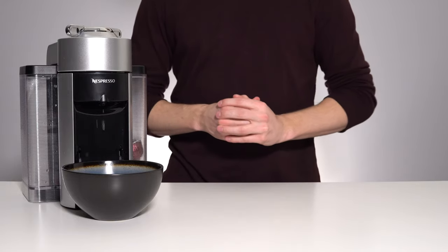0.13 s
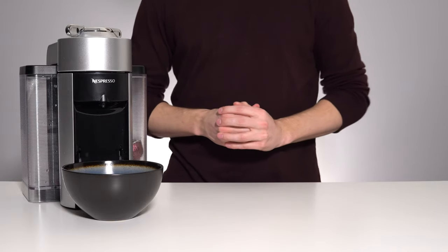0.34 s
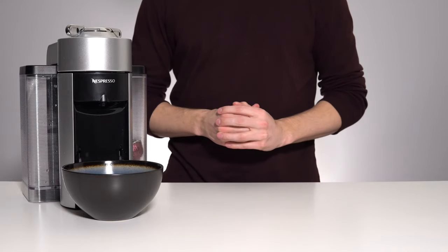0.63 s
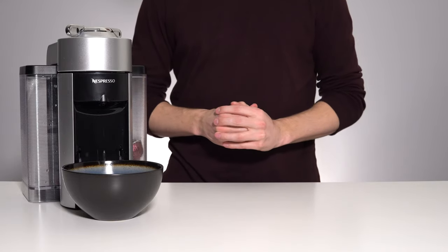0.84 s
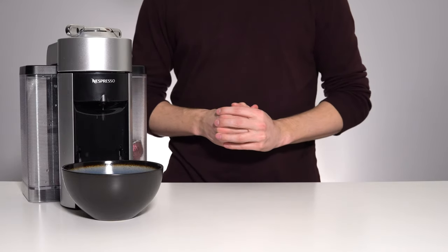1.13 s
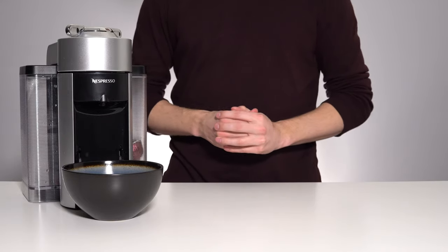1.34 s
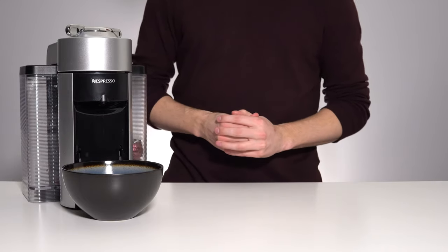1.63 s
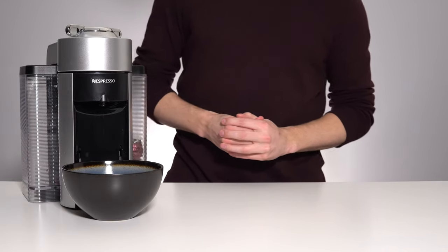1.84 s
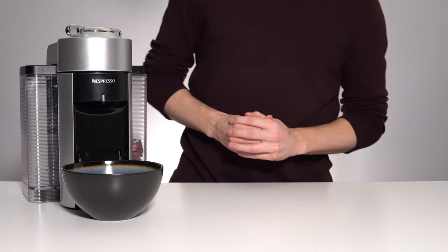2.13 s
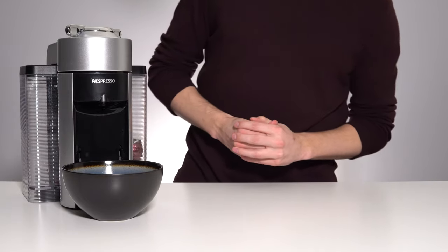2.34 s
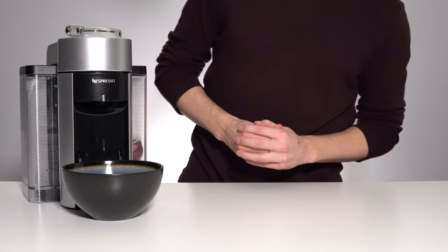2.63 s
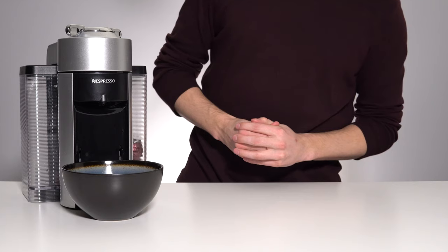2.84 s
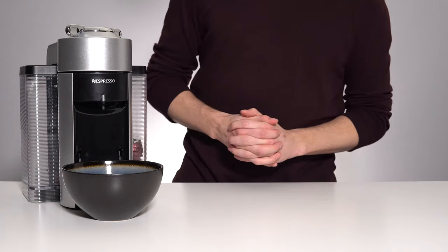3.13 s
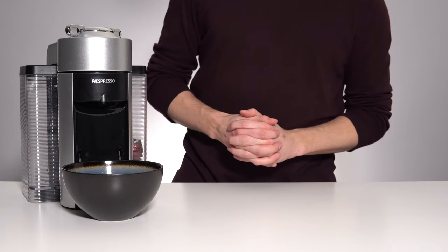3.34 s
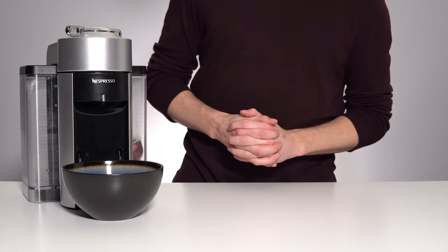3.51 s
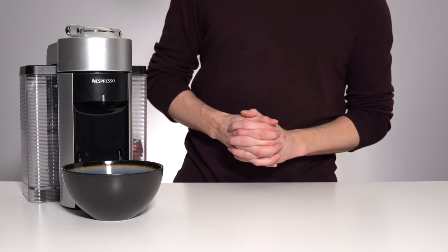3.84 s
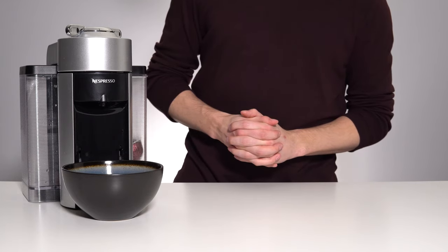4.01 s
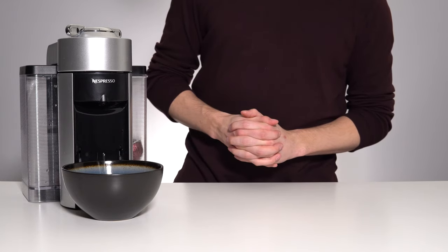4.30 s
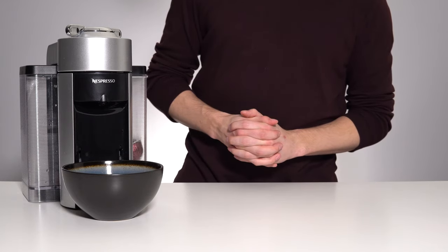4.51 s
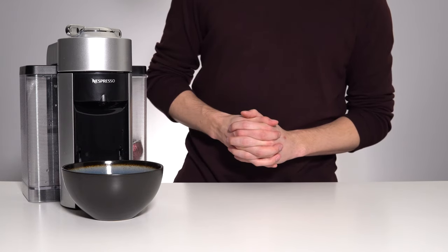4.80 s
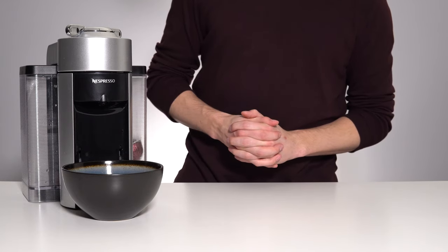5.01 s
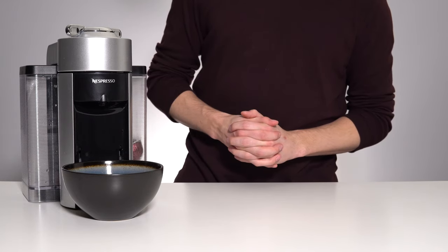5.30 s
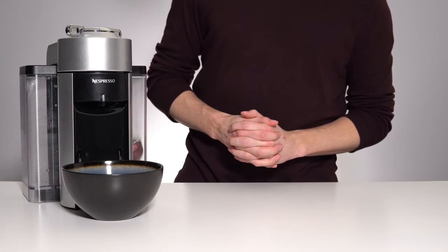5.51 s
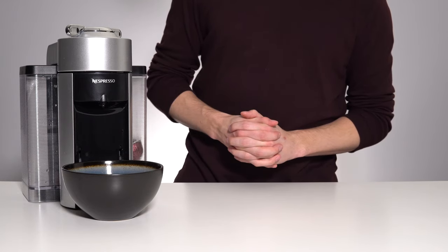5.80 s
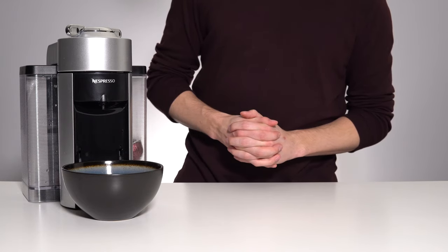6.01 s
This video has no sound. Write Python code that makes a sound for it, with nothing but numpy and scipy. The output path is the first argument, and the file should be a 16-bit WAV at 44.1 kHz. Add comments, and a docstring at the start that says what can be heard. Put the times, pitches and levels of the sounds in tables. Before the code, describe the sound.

A capsule coffee machine buzzes and rattles as it pumps water, then cuts off and winds down with a falling whine.

```python
"""A capsule coffee machine on a kitchen table drives water through. It opens with a short spurt of spray
over the steady buzz of its motor, which knocks in step with the mains, whines and rattles in the
plastic housing above a rush of water. A dull bump comes through the table, then the power is cut and
the machine shudders on its feet. The rotor coasts to rest with a falling whine and a dulling whirr,
and the quiet room remains."""
import sys
import numpy as np
from scipy import signal
from scipy.fft import rfft, irfft, next_fast_len
from scipy.io import wavfile

SR = 44100
rng = np.random.default_rng(int(sys.argv[2]) if len(sys.argv) > 2 else 0)


def inscribe(sig):
    """Save sig as 16-bit PCM at rate SR to the path in sys.argv[1].

    A 1-D sig is mono; a 2-D sig holds one channel per row.
    Samples are clipped to [-1, 1] before scaling.
    """
    pcm = np.round(np.clip(np.atleast_2d(sig).T, -1, 1) * 32767)
    wavfile.write(sys.argv[1], SR, pcm.astype(np.int16))


N = 271479
TIME = np.arange(N) / SR
MAINS_HZ, POWER_OFF_S = 59.99, 3.216


def from_db(db):
    """Decibels to gain."""
    return 10 ** (np.asarray(db) / 20)


def rms_one(x):
    """Scale to unit rms."""
    return x / np.sqrt(np.mean(x ** 2) + 1e-20)


def automation(rows):
    """A curve through (seconds, value) breakpoints."""
    return np.interp(TIME, *np.transpose(rows))


def colour(x, points):
    """EQ through (Hz, dB) points joined on a log-frequency axis."""
    hz, db = np.transpose(points)
    size = next_fast_len(N + SR // 2)
    bins = np.maximum(np.fft.rfftfreq(size, 1 / SR), 1)
    gain = from_db(np.interp(np.log(bins), np.log(hz), db))
    return irfft(rfft(x, size) * gain, size)[:N]


def noise(points):
    """Coloured noise of unit rms."""
    return rms_one(colour(rng.standard_normal(N), points))


def resonant_noise(modes):
    """Noise of unit rms through parallel resonances of alternating polarity."""
    white, out = rng.standard_normal(N), 0
    for k, (hz, width, db) in enumerate(modes):
        r = np.exp(-np.pi * width / SR)
        band = signal.lfilter([1, 0, -1], [1, -2 * r * np.cos(2 * np.pi * hz / SR), r * r], white)
        out += (-1) ** k * from_db(db) * (1 - r * r) / 2 * band
    return rms_one(out)


def lowpass(x, hz):
    """Zero-phase low-pass for splitting bands."""
    return signal.sosfiltfilt(signal.butter(2, hz, fs=SR, output="sos"), x)


def drift(rate_hz):
    """Smooth random modulation of unit rms."""
    hop, settle = 100, 2000
    r = np.exp(-2 * np.pi * rate_hz * hop / SR)
    slow = signal.lfilter([1], [1, -2 * r, r * r], rng.standard_normal(N // hop + settle + 2))[settle:]
    return np.interp(np.arange(N) / hop, np.arange(len(slow)), rms_one(slow))


def phase_of(hz):
    """Running phase of a moving pitch."""
    return 2 * np.pi * np.cumsum(hz) / SR


def scatter(x, t60):
    """Smear a sound over dense, decaying reflections."""
    t = np.arange(SR // 2) / SR
    tail = rng.standard_normal(len(t)) * from_db(-60 * t / t60)
    return signal.fftconvolve(x, tail / np.linalg.norm(tail))[:N]


def powered(t60, hold_s=0):
    """Full level until the power is cut, then a hold and a release."""
    return from_db(-60 * np.maximum(TIME - POWER_OFF_S - hold_s, 0) / t60)


# Spurts at the spout. Each row: time of the peak in seconds, hold in seconds, level in dB.
SPURTS = [(0.033, 0.036, -31), (.124, .008, -38.5)]
# Their bright hiss. Each row: frequency in Hz, gain in dB.
SPRAY_EQ = [(1500, -14), (3500, -5), (4400, 2), (5000, 6.5), (5600, 0.5), (7700, 1.5), (10000, -5.5),
            (13000, -14), (16000, -32)]

def spray(attack_s=0.031, t60=0.21, flutter_db=2.0):
    """Each spurt of spray rises quickly, holds and dies away."""
    swell = 0
    for s, hold, db in SPURTS:
        attack = np.exp(np.minimum(TIME - s, 0) / attack_s)
        swell += attack * from_db(db - 60 * np.maximum(TIME - s - hold, 0) / t60)
    return swell * from_db(flutter_db * drift(40)) * noise(SPRAY_EQ)


# Harmonics of the knocking. Each row: multiple of the mains rate, relative level in dB.
BUZZ_PARTIALS = [(1, -16), (2, -31.5), (3, -23.5), (4, -11), (5, 0.5), (6, 0.5), (7, -0.5), (8, -3.5),
                 (9, -5), (10, -3), (11, -4), (12, -3.5), (13, -3.5), (14, -6), (15, -17), (16, -10),
                 (17, -6.5), (18, -5.5), (19, -15), (20, 1), (21, -9.5), (22, -8.5), (23, -10.5), (24, -26),
                 (25, -12.5), (26, -12.5), (27, -10.5), (28, -9), (29, -13), (30, -14), (31, -25),
                 (32, -10), (33, -10.5), (34, -28), (35, -18), (36, -27), (37, -33.5), (38, -11), (39, -31),
                 (40, -11.5), (41, -19.5), (42, -33), (43, -30), (44, -11.5), (45, -28), (46, -18),
                 (47, -14), (48, -13.5), (49, -16)]

def buzz(cycle, load_db, ring_db, level_db=-32, rebound_s=.0081):
    """Knocks fuse into a buzz, combed by their rebound; the shell scrambles the phases."""
    body_db = 10 * np.log10(sum(10 ** (db / 10) for k, db in BUZZ_PARTIALS if 4 < k < 17))
    rebound = -.05 + 0.19 * load_db  # harder under a heavier load
    resonance_db = 1.2 + 1.35 * (ring_db - np.mean(ring_db))
    out = 0
    for k, db in BUZZ_PARTIALS[1:]:  # hum() plays the fundamental
        phase = 2 * np.pi * (k * cycle + rng.random()) + 0.15 * drift(1.2)
        partial = np.cos(phase) + rebound * np.cos(phase - 2 * np.pi * k * MAINS_HZ * rebound_s)
        swell_db = resonance_db if k in (20, 21) else load_db  # these two sit on the main resonance
        waver_db = np.interp(k, [1, len(BUZZ_PARTIALS)], [1.52, 2.0]) * drift(1.6)
        out += np.sqrt(2) * from_db(level_db + db - body_db + swell_db + waver_db) * partial
    return out


def hum(level_db=-54, rocking_hz=69):
    """The whole machine shakes at the mains rate; set free, it rocks out at its own pitch."""
    hz = np.interp(TIME, [POWER_OFF_S, POWER_OFF_S + .04], [MAINS_HZ, rocking_hz])
    return np.sqrt(2) * from_db(level_db) * powered(t60=0.54, hold_s=.08) * np.sin(phase_of(hz))


# The plastic edge of the rattle. Each row: frequency in Hz, gain in dB.
RATTLE_EQ = [(900, -28), (1500, -1), (2400, -9), (2900, 8), (3500, 0), (4800, -4), (9000, -20.5)]

def rattle(cycle, contacts=4, jitter_s=.00015, uneven_db=4.5):
    """Loose contacts tap once a cycle, each a little early or late, harder or softer."""
    out = 0
    for place in rng.random(contacts):
        taps = np.flatnonzero(np.diff(np.floor(cycle - place)) > 0)
        late, hard = rng.standard_normal((len(taps), 2)).T
        taps += np.round(late * jitter_s * SR).astype(int)
        clicks = np.zeros(N)
        clicks[np.clip(taps, 0, N - 1)] = from_db(uneven_db * hard)
        out += scatter(clicks * from_db(3 * drift(1)), t60=0.023)
    return rms_one(colour(out, RATTLE_EQ))


# Resonances of the housing. Each row: centre in Hz, width in Hz, gain in dB.
HOUSING_MODES = [(516, 88, 0), (853, 154, -7), (1236, 76, 4.5), (1450, 60, -15), (2214, 33, -12),
                 (2990, 190, -20), (4440, 64, -18)]

def housing_ring(ring_db, power, coasting_db=-49):
    """The rotor rings the housing, more softly once it coasts."""
    level = powered(t60=0.72) * from_db(ring_db - 4) + (1 - power) * from_db(coasting_db)
    return level * from_db(0.75 * drift(6)) * resonant_noise(HOUSING_MODES)


RUNNING_HZ = 1258

def rotor_pitch(drag_s=2.6, stands_at_s=4.67):
    """Pitch of the whine in Hz: steady until friction and drag bring the rotor to rest."""
    run_down = np.exp(-np.maximum(TIME - POWER_OFF_S, 0) / drag_s)
    rest = np.exp(-(stands_at_s - POWER_OFF_S) / drag_s)
    return np.maximum(RUNNING_HZ * (run_down - rest) / (1 - rest), 1e-3)


# Tones of the rotor. Each row: multiple of the whine's pitch, relative level in dB.
WHINE_PARTIALS = [(.4, -19), (.5, -4), (.6, -14), (1, -2), (2, -9)]

def whine(pitch_hz, ring_db, power, critical_hz=970, critical_width_hz=54, direct_db=-11.5):
    """Rotor tones, rougher without power, flare as they slide through the housing's resonances."""
    coasting_db = -45 - 10 * np.log2(RUNNING_HZ / pitch_hz)
    level = power * from_db(ring_db - 8.5) + (1 - power) * from_db(coasting_db)
    tremble = np.where(TIME < POWER_OFF_S, 0.0079, 0.0281)
    phase = phase_of(pitch_hz * (1 + tremble * drift(69.7)))
    # at the critical speed, unbalance shakes the machine at half the whine's pitch
    shake_db = 12 * np.exp(-((pitch_hz - critical_hz) / critical_width_hz) ** 2)
    out = 0
    for k, db in WHINE_PARTIALS:
        flare = sum(from_db(mode_db) / np.hypot(1, 2 * (k * pitch_hz - hz) / width)
                    for hz, width, mode_db in HOUSING_MODES)
        gain = from_db(db + shake_db * (k == .5) + 3.1 * drift(29))
        out += gain * (from_db(direct_db) + flare) * np.sin(k * phase)
    return level * out


# The motor's thin top notes. Each row: pitch in Hz, level in dB.
SINGING_TONES = [(3615, -55.5), (4675, -61.5), (4812, -57)]

def singing(tremble=0.00116):
    """The motor sings in high tones that tremble in pitch."""
    return sum(np.sqrt(2) * from_db(db) * np.sin(phase_of(hz * (1 + tremble * drift(16.3))))
               for hz, db in SINGING_TONES)


# The broad body of the water. Each row: frequency in Hz, gain in dB.
RUSH_EQ = [(30, -34), (100, -28), (180, -16), (280, -3.5), (400, 1.5), (800, -0.5), (1000, -1.5),
           (1900, -4.5), (2150, -6), (2850, -6), (3300, -11), (5400, -15), (8000, -16), (11000, -22),
           (16000, -25)]
# Narrow resonances of tubes and panels. Each row: centre in Hz, width in Hz, gain in dB.
PANEL_MODES = [(1676, 30, 7), (1948, 28, 4.5), (2366, 55, 5), (2814, 16, 2), (3880, 48, -1.5),
               (4830, 38, -21), (6040, 210, -13.5), (7810, 81, -18), (9200, 38, -21), (10730, 88, -14),
               (12800, 85, -16), (13800, 40, -21)]

def rush(cycle, load_db, split_hz=940):
    """Churning water: the lows throb with each knock, the hiss is smoother, tubes and panels ring."""
    water = noise(RUSH_EQ)
    low = lowpass(water, split_hz)
    stroke = np.cos(2 * np.pi * cycle) + 1.3 * np.cos(4 * np.pi * cycle + 2)
    stroke += 1.1 * np.cos(6 * np.pi * cycle)
    churn = low * from_db(-35.5 + load_db + 0.35 * stroke + 1.8 * drift(24))
    hiss = (water - low) * from_db(-35 + 0.9 * load_db + 0.26 * stroke + 0.37 * drift(50))
    panels = resonant_noise(PANEL_MODES) * from_db(-43.5 + 0.9 * load_db)
    return churn + hiss + panels


# Loose clatters. Each row: time of the peak in seconds, level in dB, rise and fall time in seconds.
CLATTERS = [(.2, -41, .015), (1.67, -42, .015), (1.735, -33, .014), (2.46, -40, .06), (2.605, -35.5, .011),
            (3.13, -43, .025), (3.209, -36.5, .015), (4.335, -53.5, .018)]
# Their hard midrange. Each row: frequency in Hz, gain in dB.
CLATTER_EQ = [(700, -18), (1400, -2), (2100, 13), (3400, 6), (4500, -5), (7000, -18), (14000, -32)]

def clatter(grain_db=3.0):
    """Short flurries of taps on the shell, played as grainy bursts of noise."""
    swell = sum(from_db(db) * np.exp(-abs(TIME - s) / length) for s, db, length in CLATTERS)
    return swell * from_db(grain_db * drift(150)) * noise(CLATTER_EQ)


def bump(at_s=3.088, width_s=.007, peak_db=-48):
    """One soft, dull pulse through the table."""
    return from_db(peak_db) * np.exp(-((TIME - at_s) / width_s) ** 2)


def shudder(at_s=3.24, width_s=0.16, level_db=-57.5, hz=178):
    """The machine shudders on its feet as the pump stops: a low tone swells and fades."""
    swell = from_db(level_db) * np.exp(-((TIME - at_s) / width_s) ** 2)
    return np.sqrt(2) * swell * np.sin(phase_of(hz * (1 + .02 * drift(20))))


# The rotor's rubbing before it dulls. Each row: frequency in Hz, gain in dB.
WHIRR_EQ = [(40, -45), (130, -24), (210, -6), (350, 1), (800, -3.5), (1700, -2), (3000, 3), (4600, -1),
            (7000, -2), (10000, -2), (16000, -11.5)]

def whirr(pitch_hz, level_db=-39.5, db_per_octave=4):
    """The coasting rotor rubs: the slower it turns, the softer and duller it gets."""
    rubbing, out, below = noise(WHIRR_EQ), 0, 0
    cutoff_hz = 7.3 * pitch_hz + 350
    for hz in np.geomspace(1000, 16000, 9):  # a closing low-pass, band by band
        upto = lowpass(rubbing, hz)
        out += (upto - below) / np.sqrt(1 + (hz / cutoff_hz) ** 4)
        below = upto
    return out * from_db(level_db - db_per_octave * np.log2(RUNNING_HZ / pitch_hz) + 0.5 * drift(40))


def stereo(mid, side):
    """Mid and side to left and right."""
    return np.array([mid + side, mid - side])


# The kitchen's room tone. Each row: frequency in Hz, gain in dB.
ROOM_EQ = [(15, -56), (25, -19), (91, -16), (113, -4), (173, -10), (209, -3.5), (267, -7), (297, -5.5),
           (482, -5.5), (648, -8.5), (945, -10.5), (1300, -12), (2120, -13.5), (15500, -18)]
# Its spread. Each row: frequency in Hz, side against mid in dB.
ROOM_WIDTH = [(60, -30), (240, -7.5), (950, 0.5), (3770, -1.5), (15000, -1)]

def room_tone(level_db=-60):
    """The quiet room: a bed of noise, centred in the bass and wide above."""
    return from_db(level_db) * stereo(noise(ROOM_EQ), colour(noise(ROOM_EQ), ROOM_WIDTH))


# Load on the pump. Each row: time in seconds, dB above its usual effort.
PUMP_LOAD = [(0, 2.0), (.21, 2), (.33, 0.17), (2.22, 0), (2.48, 1.7), (2.82, -0.26), (3.05, 0.2),
             (3.2, 1.4)]
# Swell of the housing's resonance, which the whine follows. Each row: time in seconds, drive in dB.
RING_DRIVE = [(0.0, -36), (0.31, -36), (0.45, -43), (0.87, -43), (1.07, -39), (1.09, -42.5), (1.39, -39),
              (1.59, -45), (1.68, -39), (1.76, -42), (1.93, -38.5), (1.97, -43), (2.48, -35.5), (2.55, -43),
              (2.71, -32.5), (2.74, -37.5), (3.2, -34.5)]
# The machine's spread. Each row: frequency in Hz, gain of the side signal in dB.
MACHINE_WIDTH = [(60, -48), (120, -33), (240, -57), (480, -17.5), (950, -10), (1890, -6), (3770, -5),
                 (7520, -4.5), (15000, -4)]
# Its slight lean off centre. Each row: frequency in Hz, left minus right in dB.
MACHINE_PAN = [(120, 0), (240, .3), (480, 0), (950, -1.5), (1890, -.6), (3770, 0), (7520, -1.2),
               (15000, -2.4)]

def scene():
    """The machine under power and coasting, with the kitchen's reflections, over the room tone."""
    load_db, ring_db = automation(PUMP_LOAD), automation(RING_DRIVE)
    pitch_hz, power = rotor_pitch(), powered(t60=0.6)
    turning = np.clip(pitch_hz / 190, 0, 1)  # the rotor's sounds fade out below 190 Hz
    # the knock wanders within the mains cycle and trembles from one cycle to the next
    cycle = MAINS_HZ * TIME + 0.0059 * drift(0.68) + 0.0017 * drift(30)
    knocking = buzz(cycle, load_db, ring_db) + from_db(-46 + 0.9 * load_db) * rattle(cycle)
    knocking *= powered(t60=0.45)  # dies sooner than the water
    rotor = housing_ring(ring_db, power) + whine(pitch_hz, ring_db, power)
    motor = knocking + power * singing() + turning * rotor
    motor += hum() + bump() + shudder() + clatter()

    def hissing():
        """Water, rubbing and spray, drawn afresh for the direct sound and for the reflections."""
        return power * rush(cycle, load_db) + (1 - power) * turning * whirr(pitch_hz) + spray()

    direct = motor + hissing()
    reflections = scatter(motor, t60=0.5) + hissing()
    left, right = stereo(direct, colour(reflections, MACHINE_WIDTH))
    left = colour(left, [(hz, db / 2) for hz, db in MACHINE_PAN])
    right = colour(right, [(hz, -db / 2) for hz, db in MACHINE_PAN])
    return np.array([left, right]) + room_tone()


def record(dry):
    """A steep high cut at 15.8 kHz."""
    return signal.sosfilt(signal.ellip(12, .1, 80, 15800, fs=SR, output="sos"), dry)


dry = scene()
out = record(dry)
inscribe(out)
```